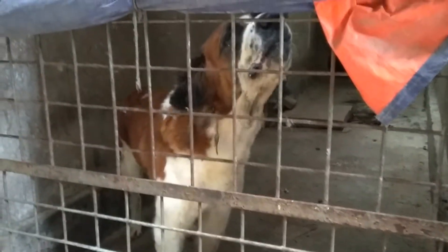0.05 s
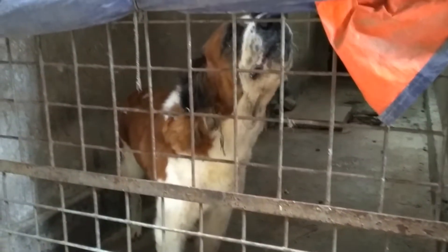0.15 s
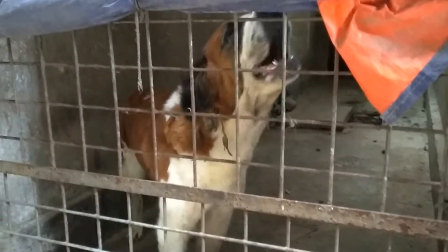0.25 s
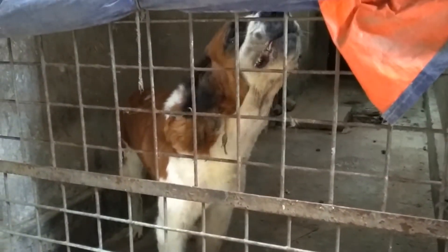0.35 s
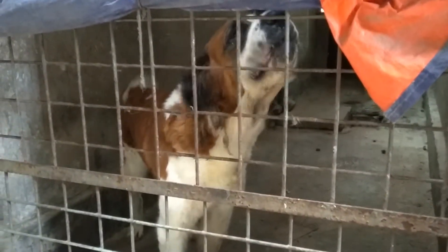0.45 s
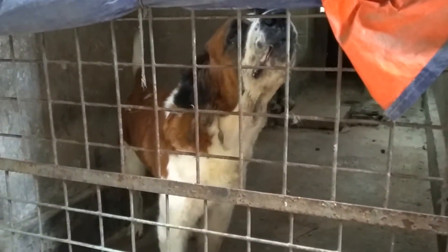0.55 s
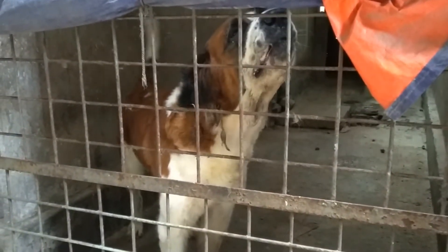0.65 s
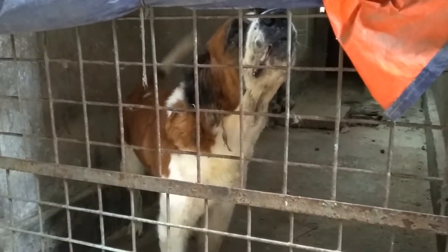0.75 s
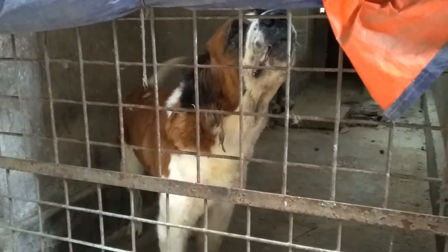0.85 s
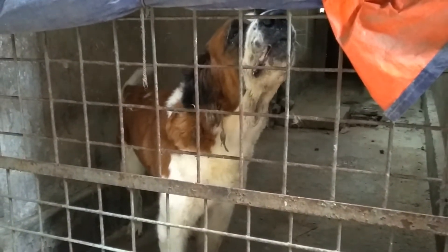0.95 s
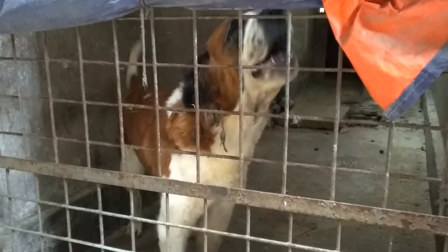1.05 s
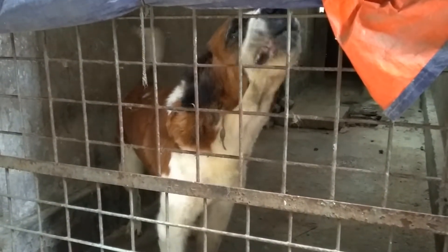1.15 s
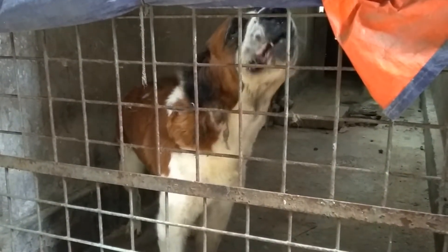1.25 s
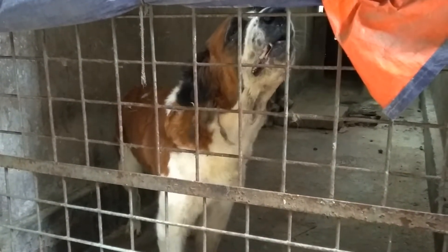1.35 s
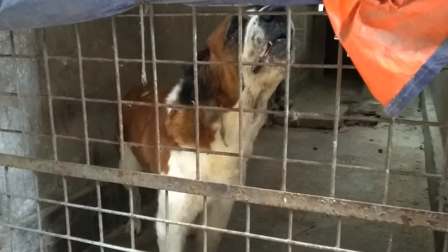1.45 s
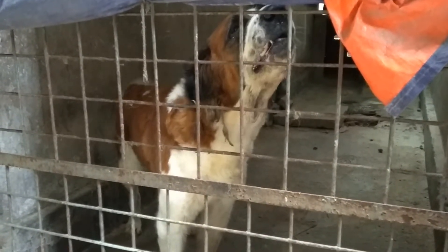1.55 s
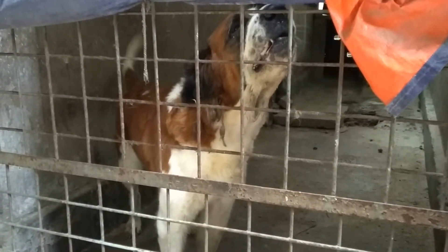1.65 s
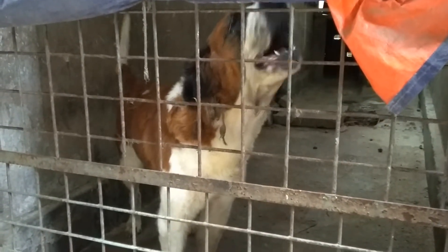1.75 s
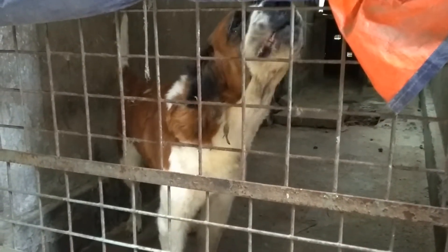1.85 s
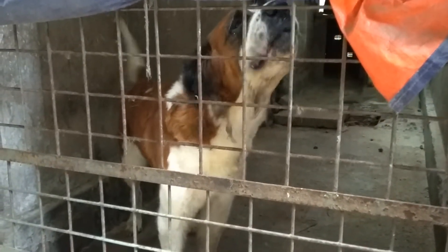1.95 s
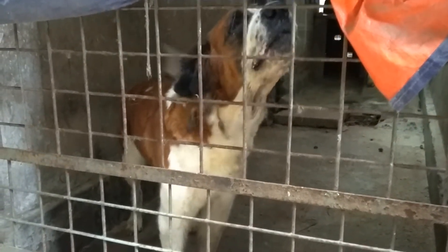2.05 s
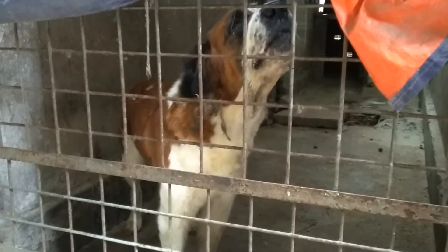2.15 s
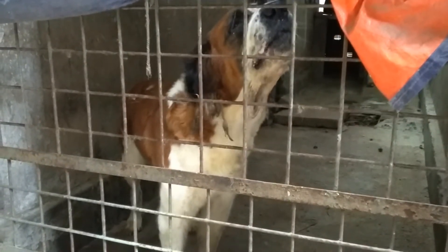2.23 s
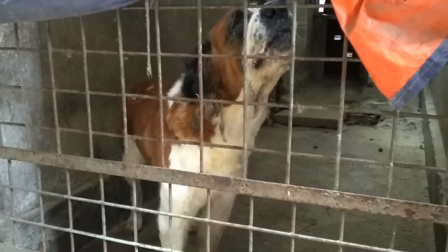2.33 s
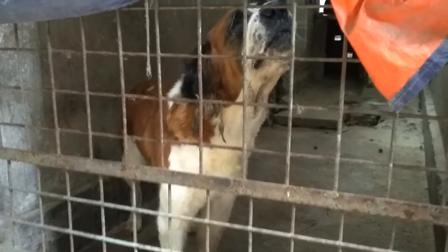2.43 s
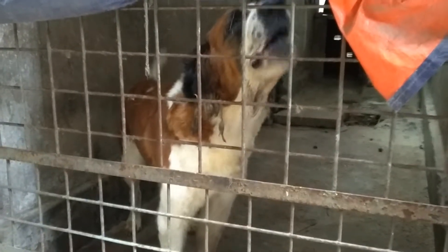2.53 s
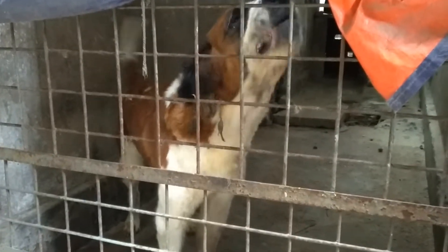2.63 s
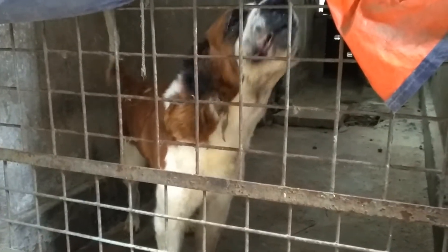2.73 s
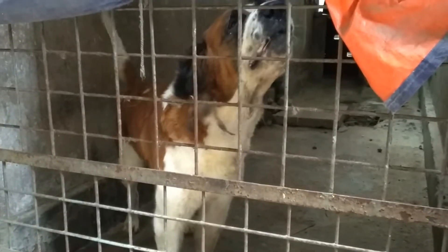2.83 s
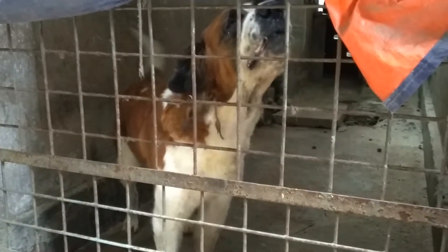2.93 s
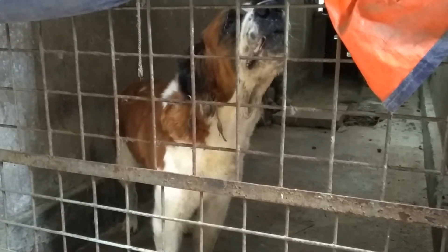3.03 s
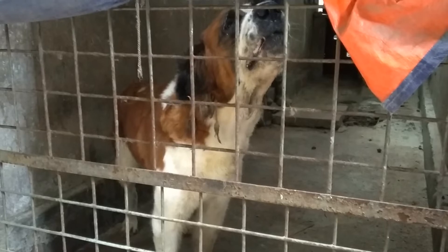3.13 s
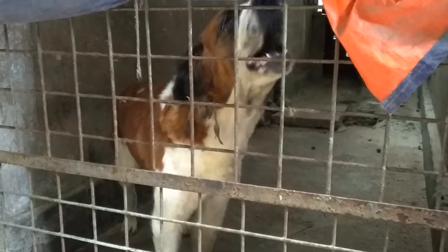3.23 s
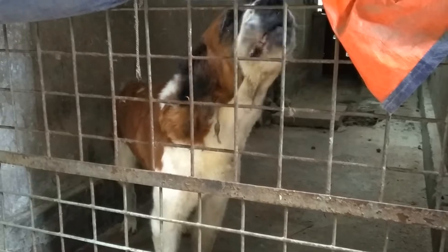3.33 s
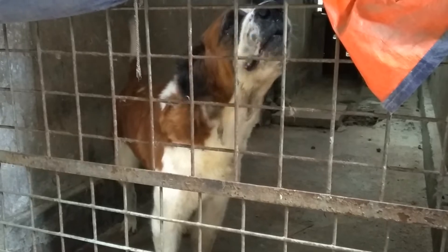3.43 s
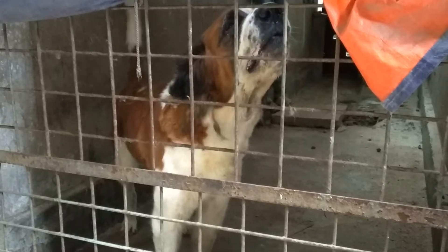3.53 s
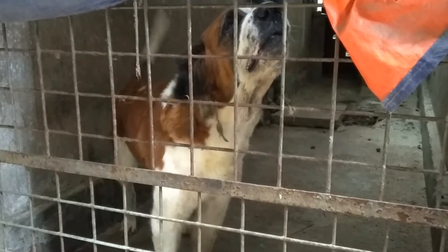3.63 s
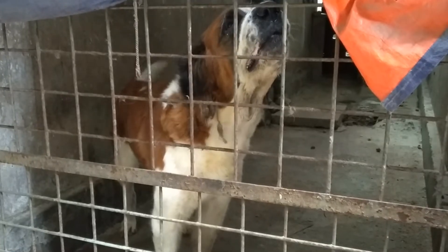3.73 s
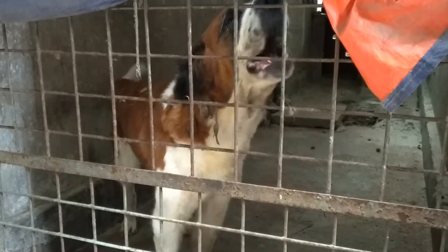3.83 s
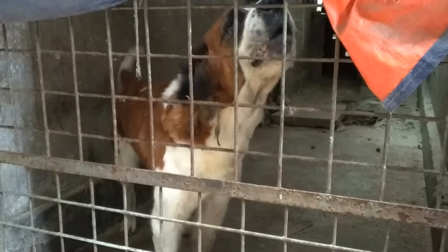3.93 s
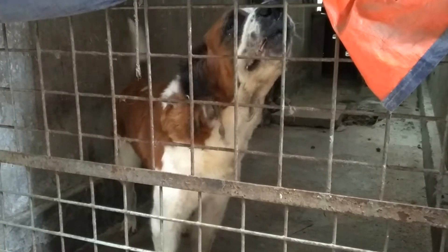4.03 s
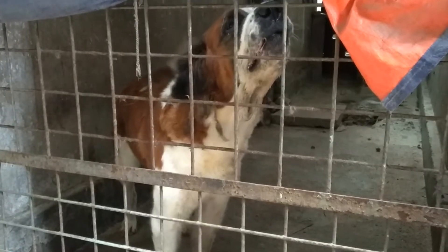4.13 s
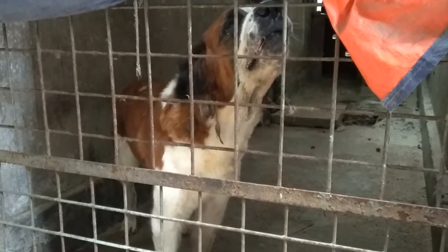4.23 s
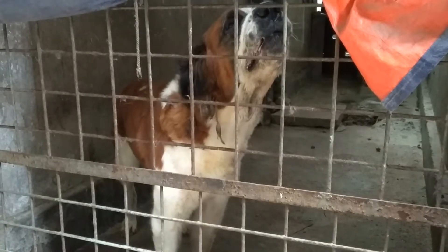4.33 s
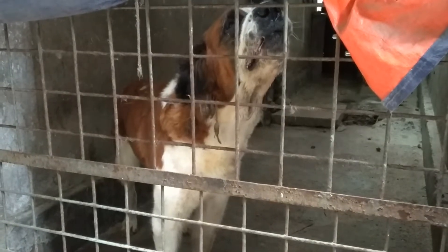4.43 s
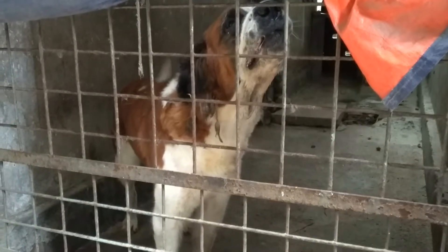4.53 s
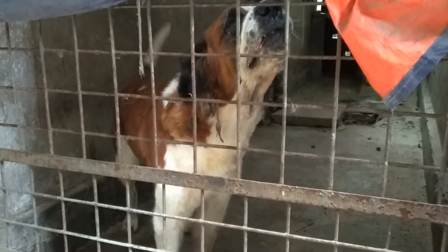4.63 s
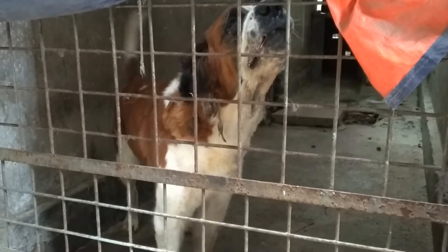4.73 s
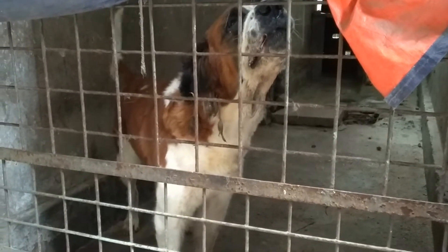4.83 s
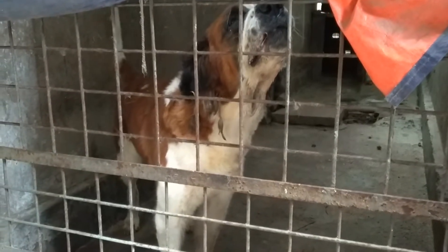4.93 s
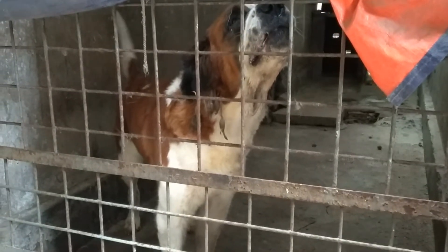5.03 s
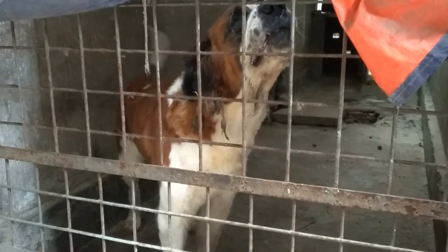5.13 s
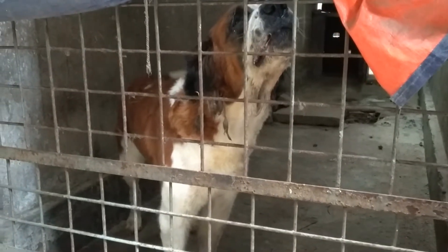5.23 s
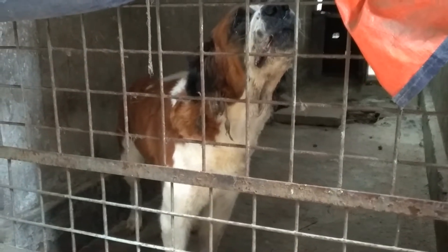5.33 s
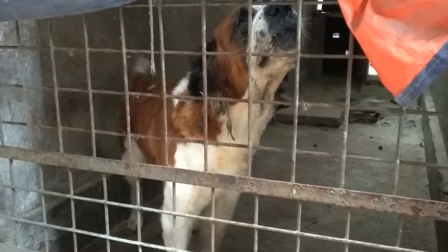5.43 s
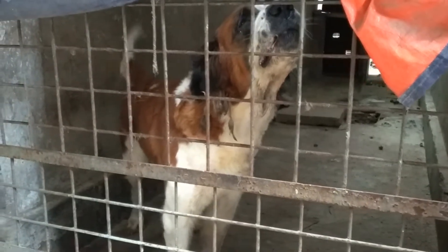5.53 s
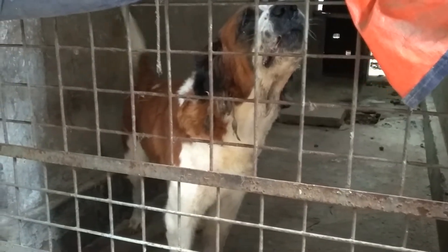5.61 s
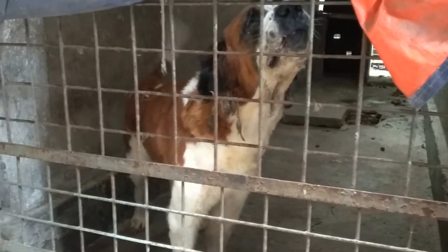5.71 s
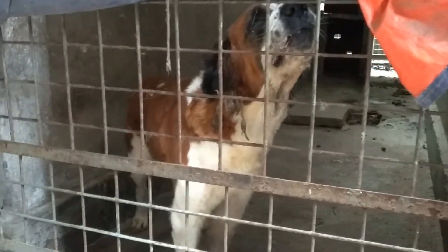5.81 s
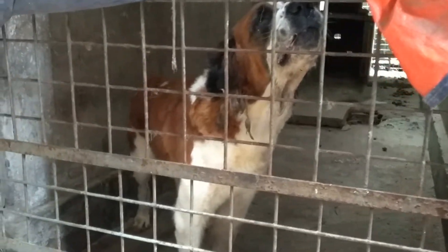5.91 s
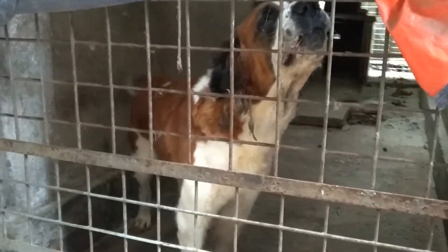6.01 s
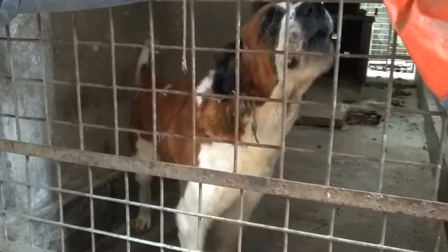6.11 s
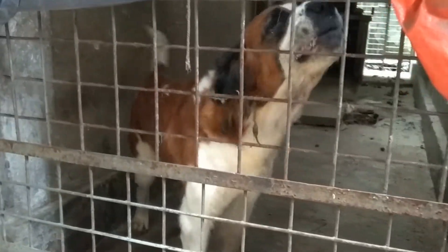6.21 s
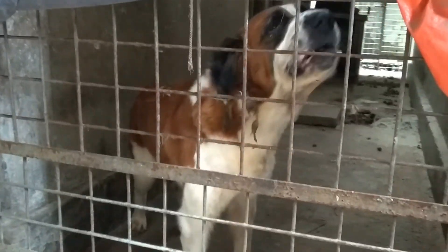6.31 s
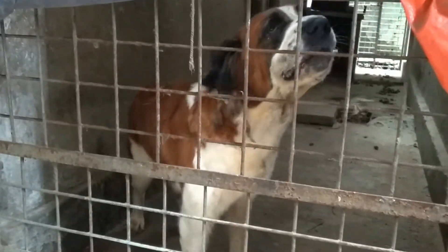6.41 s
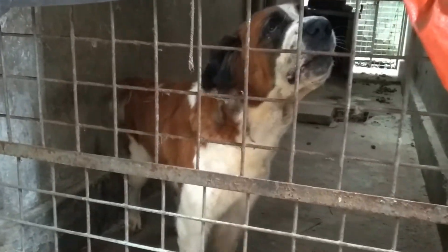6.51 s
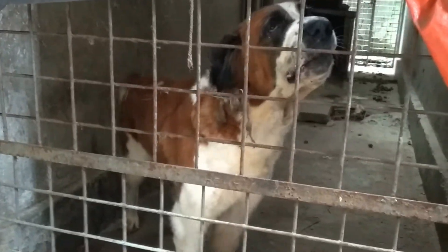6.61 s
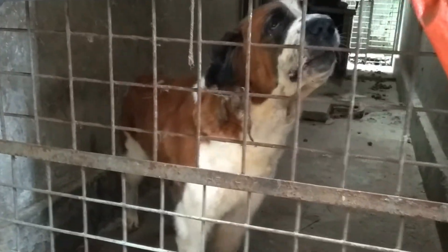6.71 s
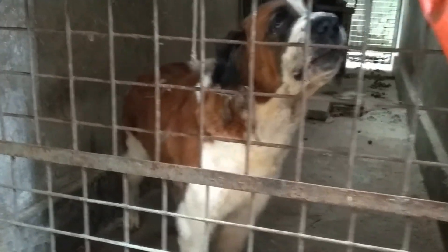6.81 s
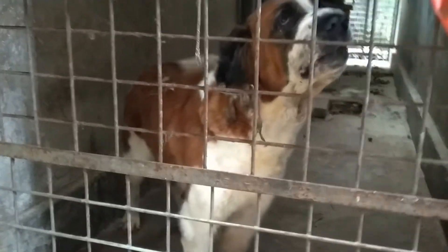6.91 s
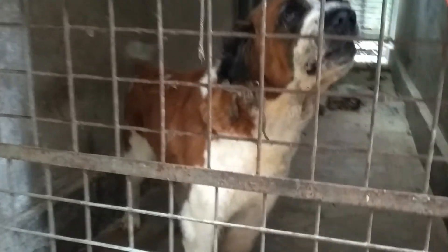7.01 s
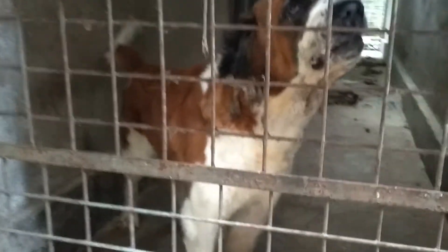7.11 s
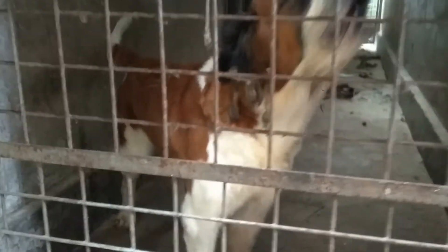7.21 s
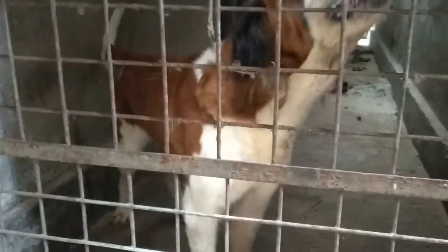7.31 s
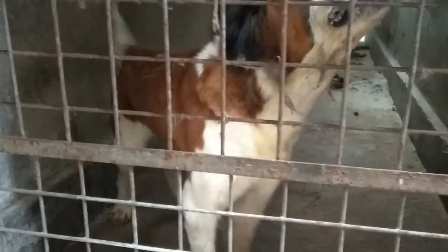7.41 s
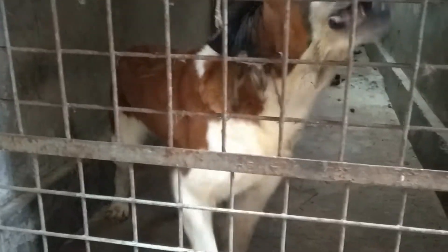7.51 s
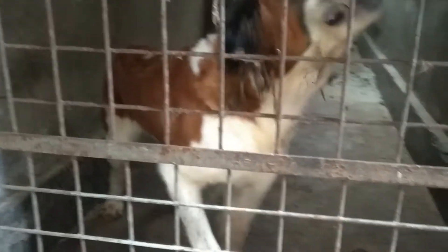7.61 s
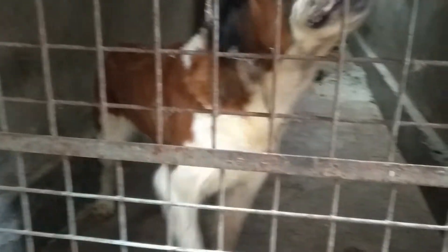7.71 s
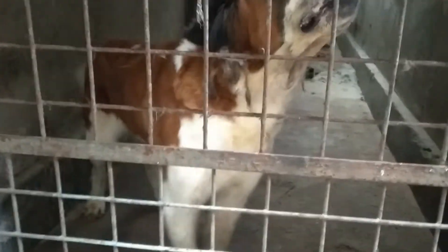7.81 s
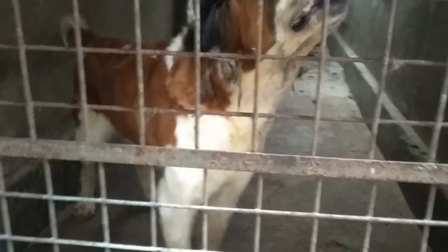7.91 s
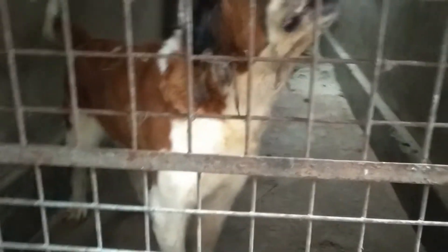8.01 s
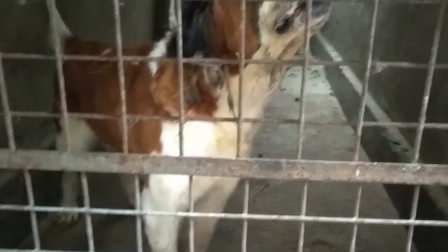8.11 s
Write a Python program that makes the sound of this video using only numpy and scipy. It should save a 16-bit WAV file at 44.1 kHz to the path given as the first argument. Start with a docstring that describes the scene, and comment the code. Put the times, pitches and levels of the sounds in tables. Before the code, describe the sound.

A low, unsteady rumble and the dying boom of an earlier bark open the scene. A large dog, close to a handheld camera, barks at about 0.2, 1.0, 1.7, 2.5, 3.2 and 3.8 seconds: loud, hoarse bursts whose pitch jumps up, sags and breaks into a short growl, with raspy air on top. Concrete walls ring after each, and the peaks sound squashed. A thin whine rises between 0.5 and 1.1. Small clicks of jaws or claws appear from 3.0. From 4 to 6 seconds there is only faint panting, echo, dull camera knocks and a very faint bird. A soft grunt at 5.85 and a falling whimper at 6.03 lead straight into a bark at 6.1. Low handling rustles follow, then barks at 7.1 and 7.5, the second softer. Echoes fade, with a bird chirp and low whine starting at 8.0.

```python
"""The boom of an earlier bark dies away over a low rumble, then a large dog barks nine times in a concrete kennel.
Each bark is uneven vocal-fold pulses and torn air: an arch of pitch that breaks into a short growl.
Filters shape throat and mouth, noise tails and resonators ring as the kennel, and the camera's limiter holds peaks down.
Between barks: a soft grunt, a falling whimper, panting and whines; clicks, light scuffs and a far bird; camera handling.
Noise bursts make the clicks, scuffs and handling rustles; gliding tones make the chirps and bumps."""
import sys
import numpy as np
from scipy import signal
from scipy.fft import rfft, irfft, next_fast_len
from scipy.io import wavfile
from scipy.ndimage import uniform_filter1d

SR = 44100
rng = np.random.default_rng(int(sys.argv[2]) if len(sys.argv) > 2 else 0)


def dump(signal):
    """Clip the signal to [-1, 1] and save it as 16-bit WAV at the path in sys.argv[1]."""
    limited = np.clip(np.atleast_2d(signal).T, -1, 1)
    pcm = np.round(limited * 32767).astype(np.int16)
    wavfile.write(sys.argv[1], SR, pcm)


N = 359856  # length in samples


def amp(db):
    """Decibels to gain."""
    return 10 ** (np.asarray(db) / 20)


def evened(x):
    """Scales to rms 1."""
    return x / np.sqrt(np.mean(x ** 2) + 1e-20)


def read(points, hz):
    """Reads a spectrum table on a log-frequency axis."""
    f, value = np.transpose(points)
    return np.interp(np.log(hz + 1), np.log(f + 1), value)


def add(mix, start_s, sound):
    """Mixes a sound in at its start time."""
    part = mix[max(round(start_s * SR), 0):][:len(sound)]
    part += sound[:len(part)]


def shaped(x, gain):
    """Filters by a gain given as a function of frequency."""
    size = next_fast_len(x.shape[-1] + SR // 10)
    spectrum = rfft(x, size) * gain(np.fft.rfftfreq(size, 1 / SR))
    return irfft(spectrum, size)[..., :x.shape[-1]]


def coloured(x, points, size=4096):
    """Causal filter: the resonances ring after the sound, never before."""
    hz = abs(np.fft.fftfreq(size, 1 / SR))
    log_gain = np.log(amp(read(points, hz)))
    # minimum phase, from the Hilbert transform of the log gain
    taps = np.fft.ifft(np.exp(np.conj(signal.hilbert(log_gain)))).real[:size // 2]
    return signal.oaconvolve(x, taps)[:len(x)]


def wander(count, hz):
    """Random drift of rms 1, fading out above about hz."""
    return evened(shaped(rng.standard_normal(count), lambda f: np.exp(-(f / hz) ** 2)))


def hiss(count, hz, octaves):
    """Noise in one bell-shaped band, rms 1."""
    bell = lambda f: np.exp(-.5 * (np.log2((f + 1) / hz) / octaves) ** 2)
    return evened(shaped(rng.standard_normal(count), bell))


def pair(a, b, likeness):
    """Turns two unrelated signals into left and right channels with a set likeness at each frequency."""
    same = lambda f: np.clip(read(likeness, f), -1, 1)
    right = shaped(a, same) + shaped(b, lambda f: np.sqrt(1 - same(f) ** 2))
    return np.array([a, right])


def kennel(x, delay=0.011, build_up=0.018):
    """Dense echoes off concrete: noise tails that build up (s), then die at each band's own speed."""
    # decay: hz, t60_s
    decay_times = [(150, 0.6), (400, 0.84), (1040, 0.66), (2760, 1), (7280, 0.49), (14000, .3)]
    # echo strength before each sound's wet level: hz, level_db
    echo_levels = [(100, -4.5), (300, -2), (600, -6.5), (1200, -10), (2500, -14.5), (5000, -9), (9000, -15)]
    # stereo width of the echoes: hz, left_right_likeness (0-1)
    echo_likeness = [(60, 0.9), (300, 0.96), (640, 0.87), (1400, 0.11), (3000, .05), (15000, .05)]
    hz, t, z = signal.stft(rng.standard_normal((2, SR)), SR, nperseg=512)
    z = z * amp(-60 * t / read(decay_times, hz)[:, None])
    z *= 1 - np.exp(-np.maximum(t - delay, 0) / build_up)
    # even out each band's energy before setting its level
    energy = uniform_filter1d((abs(z) ** 2).sum(2), size=3, axis=1)
    z *= amp(read(echo_levels, hz))[:, None] / np.sqrt(energy)[..., None]
    tails = signal.istft(z, SR, nperseg=512)[1] * np.sqrt(3) / 512
    return signal.fftconvolve(x[None], pair(*tails, echo_likeness), axes=1)[:, :N]


def rumble(swell_db=3.5, patchy_db=2):
    """Low outdoor background noise: the bass swells unevenly and three octaves above it waver on their own."""
    # colour of the background: hz, relative level_db
    colour = [(12, -24.5), (25, 3), (55, -4.5), (110, -12), (200, -14), (350, -14.5), (600, -19.5),
              (1050, -24.5), (1400, -38), (2000, -42.5), (3000, -49), (6000, -57.5), (11000, -58),
              (15500, -61.5)]
    # stereo width: hz, left_right_likeness (0-1)
    likeness = [(30, 0.058), (100, 0.73), (300, 0.97), (1200, 0.28), (3000, 0.22), (15000, 0.098)]
    # bass against the rest, before its swells: time_s, level_db
    deep_levels = [(0, -6), (1.4, -.5), (2.799, -1.5), (4.6, 0.5), (8.16, 2.5)]
    # background fader: time_s, level_db
    fader = [(0, -32), (.8, -35.5), (2.3, -37), (3.6, -35), (4.6, -37.5), (5, -36.5), (5.599, -38),
             (6.898, -37.5), (8.16, -37.5)]
    t = np.arange(N) / SR
    noise = pair(*rng.standard_normal((2, N)), likeness)
    noise = evened(shaped(noise, lambda f: amp(read(colour, f))))
    bass = shaped(noise, lambda f: np.exp(-(f / 220) ** 2))
    deep_db = np.interp(t, *np.transpose(deep_levels))
    out = noise + bass * (amp(deep_db + swell_db * wander(N, 8)) - 1)
    for hz in (400, 800, 1600):
        band = shaped(noise, lambda f: np.exp(-(2 * np.log2((f + 1) / hz)) ** 2))
        out = out + band * (amp(patchy_db * wander(N, 6.7)) - 1)
    return amp(np.interp(t, *np.transpose(fader))) * out


def last_echo(level_db=-31, t60=1.0):
    """The boom of an earlier bark: a band of noise already dying away at the start."""
    return amp(level_db - 60 * np.arange(N) / SR / t60) * hiss(N, 470, 0.31)


def bird(start_hz=4650, end_hz=3550, wet_db=2, direct_db=-8, buzz=.075):
    """A far bird: falling tones with a buzzy pitch, blurred by echoes that build up slowly."""
    # chirps: start_s, level_db
    chirps = [(2.009, -60), (4.598, -59), (5.29, -61), (7.01, -53.5), (8.018, -49)]
    out, count = np.zeros(N), int(.09 * SR)
    for start_s, level_db in chirps:
        hz = np.linspace(start_hz, end_hz, count) * (1 + buzz * wander(count, 400))
        tone = np.sin(2 * np.pi * np.cumsum(hz) / SR)
        add(out, start_s, amp(level_db) * tone * signal.windows.tukey(count, .2))
    return amp(direct_db) * out + amp(wet_db) * kennel(out, build_up=.06)


def bumps(edge_db=-9, edge_hz=650, dull_hz=1900):
    """Knocks on the camera body: a dull tick, and a short swing that slows down."""
    # knocks that drop in pitch: start_s, level_db, start_hz, end_hz, decay_s
    knocks = [(0.107, -30, 202, 50, .012), (1.971, -9.5, 113, 44.8, 0.025), (3.58, -25.5, 224, 73.5, 0.013),
              (4.089, -18, 262, 81.5, 0.0089), (4.332, -23.5, 228, 68.6, 0.019),
              (4.91, -15, 336, 64, 0.018), (5.249, -24, 240, 92, .012), (5.621, -13.5, 354, 74.6, .009),
              (5.953, -26, 200, 60.4, 0.012), (6.055, -14, 262, 60, 0.008), (8.001, -27, 213, 63.2, 0.02)]
    out, t = np.zeros(N), np.arange(SR // 5) / SR
    for start_s, level_db, start_hz, end_hz, decay_s in knocks:
        hz = end_hz + (start_hz - end_hz) * np.exp(-t / 0.004)
        swing = np.sin(2 * np.pi * np.cumsum(hz) / SR) * np.exp(-t / decay_s)
        tick = np.sin(2 * np.pi * edge_hz * t) * np.exp(-t / 0.0014)
        tick *= start_hz / 300  # knocks that start higher tick more
        add(out, start_s, amp(level_db) * (swing + amp(edge_db) * tick))
    return signal.lfilter(*signal.butter(2, dull_hz, fs=SR), out)


def small_sounds(wet_db=-5, left_db=3):
    """Clicks of jaws and claws as decaying noise; rustles, scuffs and a squeak as noise that swells and fades."""
    # jaws and claws: start_s, level_db, centre_hz, width_octaves, decay_s
    clicks = [(3.002, -42.5, 4500, 2.2, 0.0046), (3.428, -42, 3120, 0.17, 0.0027),
              (3.565, -62, 3500, 0.15, 0.0051), (4.047, -39.5, 3160, 0.18, 0.0039),
              (4.05, -48, 8500, 0.68, 0.003), (4.467, -51, 8900, 1.6, .006), (4.659, -65, 8870, 0.36, .008),
              (4.85, -60, 8500, 0.22, .008), (7.731, -54.5, 4400, 0.7, 0.017),
              (7.843, -65, 9100, 1.3, 0.0051), (8.013, -48, 2960, 0.66, 0.0052)]
    # low handling rustles of the camera, light scuffs, and first a thin, high squeak in the whimper
    # before the seventh bark: start_s, length_s, level_db, centre_hz, width_octaves
    noise_swells = [(6.019, 0.078, -54, 2350, .11), (6.216, 0.21, -55.5, 2990, 1),
                    (6.718, 0.13, -33, 150, 0.65), (6.95, 0.11, -32, 137, 0.8),
                    (7.28, 0.15, -29, 100, 0.78), (7.273, .15, -58, 2570, .3), (7.602, 0.31, -36, 90, 0.96)]
    out, t = np.zeros(N), np.arange(SR // 10) / SR
    for start_s, level_db, hz, octaves, decay_s in clicks:
        envelope = np.exp(-t / decay_s) * (1 - np.exp(-t / 0.00046))
        add(out, start_s, amp(level_db) * hiss(len(t), hz, octaves) * envelope)
    for start_s, length_s, level_db, hz, octaves in noise_swells:
        count = int(length_s * SR)
        add(out, start_s, amp(level_db) * hiss(SR, hz, octaves)[:count] * np.hanning(count))
    return out * amp([[left_db], [0]]) + amp(wet_db) * kennel(out)


def whine(rows, overtone_db=-26):
    """A thin, nearly pure tone that wavers a little, with one faint overtone; gives its start (s) and sound."""
    time_s, *columns = np.transpose(rows)
    t = np.arange(time_s[0], time_s[-1], 1 / SR)
    hz, level_db = (np.interp(t, time_s, column) for column in columns)
    phase = 2 * np.pi * np.cumsum(hz * (1 + 0.012 * wander(len(t), 110))) / SR
    tone = np.sin(phase) + amp(overtone_db) * np.sin(2 * phase)
    return time_s[0], amp(level_db) * tone * signal.windows.tukey(len(t), .1)


def pant(length_s, level_db, flutter_db=1.5):
    """The dog's breath: noise that swells and fades through its half-open mouth."""
    # half-open mouth: hz, level_db
    mouth = [(500, -23), (1000, -5), (1400, -3), (1600, -4), (1950, 2.5), (2200, -2), (2550, -20.5),
             (3200, -21), (4000, -21), (5500, -28.5), (6400, -22), (8000, -28), (15000, -42.5)]
    count = int(length_s * SR)
    air = evened(coloured(rng.standard_normal(count), mouth))
    return air * amp(level_db + flutter_db * wander(count, 40)) * signal.windows.tukey(count, .7)


def folds(effort_db, hz, rough, jitter=.075, shimmer=0.97, half_lines=1.0, slope=1.0,
          chest_hz=225, chest_pitch_hz=310, puff_db=13):
    """Vocal folds beat unevenly, strong and weak by turns, and let through a puff of air each cycle."""
    count, rough = len(hz), np.clip(rough, 0, 1)
    turns = np.cumsum(hz * (1 + jitter * rough * wander(count, 160))) / SR
    beat = evened(sum(np.cos(2 * np.pi * k * turns) / k ** slope for k in range(1, 13)))
    # half-rate pulsing makes cycles alternate; shimmer varies their strength at random
    beat *= 1 + rough * (half_lines * np.cos(np.pi * turns) + shimmer * wander(count, 160))
    puffs = evened((0.3 + np.exp(-(turns % 1) / 0.16)) * rng.standard_normal(count))
    puffs = shaped(puffs, lambda f: 1 / np.sqrt(1 + (f / 1500) ** 2)) * amp(puff_db)
    drive = (1 - rough ** 2) * beat + rough * puffs
    # the chest sounds mainly while the folds are slack and the pitch is low
    chest = shaped(drive, lambda f: 1 / (1 + (f / chest_hz) ** 8))
    drive = drive - chest * (1 - 1 / (1 + (hz / chest_pitch_hz) ** 6))
    return amp(effort_db) * drive * signal.windows.tukey(count, .05)


def grunt_or_whimper(length_s, effort_db, start_hz, end_hz, roughness):
    """A short, soft sound of the folds that sinks in pitch: a grunt when low, a whimper when higher."""
    count = int(length_s * SR)
    voiced = folds(effort_db, np.linspace(start_hz, end_hz, count), roughness)
    return voiced * signal.windows.tukey(count, 0.37)  # share spent swelling and fading


def rasp(t, effort_db, level_db, steepness=1.3, flutter_db=4.5, burst_db=3, burst_s=.018,
         burst_width_s=.02, held_db=-1.5):
    """Air tears past tongue and teeth in uneven spurts, following effort and hardest as the jaws fly open."""
    # upper resonances of the mouth: hz, level_db
    teeth = [(900, -23.5), (1500, 8), (1950, 12.5), (2200, -13), (2500, -0.5), (3150, -9.5), (3650, -5),
             (4100, -5.5), (4600, -8.5), (5900, -10), (6800, -12.5), (12500, -24), (15000, -28.5)]
    air = evened(coloured(rng.standard_normal(len(t)), teeth))
    opening_db = held_db + burst_db * np.exp(-((t - burst_s) / burst_width_s) ** 2)
    return air * amp(level_db + opening_db + steepness * effort_db + flutter_db * wander(len(t), 150))


def bark(rise, hold, growl, force_db, top_hz, roughness, growl_db, rasp_db):
    """One push of the chest swells, holds while the pitch arches, then breaks into a growl; gives voice and air."""
    start_db, sag_db, break_db, growl_fade_db = -32.5, -0.5, -3.5, -9.5
    break_share, growl_share = .25, .55  # break and growl crest, as shares of the growl's length
    slack_hz, attack_hz, climb_s, sag_hz_per_s = 128.62, 355, .042, 350
    rough_attack, rough_growl = .42, .72  # roughness 0-1
    t = np.arange(-rise, hold + growl, 1 / SR)  # full force falls at zero
    breaks, crest, end = hold + growl * np.array([break_share, growl_share, 1])
    effort_db = force_db + np.interp(
        t, [-rise, 0, hold, breaks, crest, end],
        [start_db, 0, sag_db, growl_db + break_db, growl_db, growl_db + growl_fade_db])
    # slack folds at both ends; a climb to the top, a slow sag, then the fall
    sagged_hz = top_hz - sag_hz_per_s * (breaks - climb_s)
    hz = np.interp(t, [-rise, 0, climb_s, breaks, end],
                   [slack_hz, attack_hz, top_hz, sagged_hz, slack_hz])
    rough = np.interp(t, [0, climb_s, hold, breaks],
                      [rough_attack, roughness, roughness, rough_growl])
    return folds(effort_db, hz, rough), rasp(t, effort_db, rasp_db)


def walls(x):
    """Standing waves between parallel walls: narrow resonators that ring on after each sound."""
    # ringing before its mix level: pitch_hz, width_hz, level_db
    modes = [(284, 15, -4), (418, 25, -2), (513, 31, -3.5), (605, 67, -4), (675, 14, -4.5),
             (810, 14, -15.5), (946, 14, -9), (1023, 8.3, -1.5), (1179, 86, -6.5), (1434, 71, -4.5),
             (1560, 41, -3.5), (1937, 84, 1)]
    return sum(amp(level_db) * signal.lfilter(*signal.iirpeak(hz, hz / width_hz, SR), x)
               for hz, width_hz, level_db in modes)


def near_walls(x, level_db=-3, first_s=.001, last_s=0.017, count=6):
    """A few early echoes off floor, bars and side walls, different at each port."""
    taps = np.zeros((2, SR // 10))
    for ear in taps:
        places = (rng.uniform(first_s, last_s, count) * SR).astype(int)
        ear[places] = rng.choice([-1, 1], count) / np.sqrt(count)
    return amp(level_db) * signal.oaconvolve(x[None], taps, axes=1)[:, :N]


def dog(direct_db=-3, rasp_direct_db=-2, rasp_wet_db=-1, voice_wet_db=-1, ring_direct_db=-2, ring_wet_db=-10):
    """Barks, grunt, whimper, panting and whines in the kennel, as they reach the two microphone ports."""
    # barks: full_force_s, rise_s, hold_s, growl_s, effort_db, top_hz, roughness (0-1),
    # growl_db (against the effort), rasp_db (level of the airy rasp)
    bark_events = [(0.201, 0.045, .085, .110, -0.5, 522.4, 0.56, -8, -38.5),
                   (1.008, 0.042, .105, .090, -1.5, 422, 0.58, -8.5, -40),
                   (1.705, .055, .085, .130, 0.5, 431.4, .62, -11, -41.5),
                   (2.502, 0.047, .088, 0.14, -1.5, 540.3, 0.42, -13.5, -36.5),
                   (3.164, 0.05, .090, 0.093, -2, 561, 0.54, -8.5, -36),
                   (3.758, 0.056, 0.11, .085, -1.5, 556.6, 0.56, -13, -36),
                   (6.104, .025, .070, 0.15, 1, 569.8, 0.7, -12, -39.5),
                   (7.140, 0.026, .075, .145, -0.5, 510, 0.54, -7, -45),
                   (7.460, .045, .105, 0.14, -3, 443.2, 0.54, -14, -43)]
    # a soft grunt and a short falling whimper: start_s, length_s, effort_db, start_hz, end_hz, roughness (0-1)
    soft_voice_events = [(5.849, .085, -30, 226, 216, 0.38), (6.033, 0.07, -22.5, 414, 318, .15)]
    # panting: start_s, length_s, level_db
    pant_events = [(3.559, .22, -54), (4.271, .4, -54.5), (5.057, .44, -55)]
    # whines through the nose, one table each: time_s, pitch_hz, level_db
    whine_tables = [
        [(.48, 1160, -77), (.58, 1210, -41.5), (.66, 1295, -43), (.76, 1367, -43.5), (.86, 1375, -43),
         (.98, 1370, -46), (1.08, 1300, -62)],
        [(8.0, 915, -63), (8.04, 918, -46), (8.2, 858, -40)],
    ]
    # throat and open mouth: hz, level_db
    throat = [(60, -27.5), (150, -1), (300, -4), (560, -1), (690, -2), (790, -13.5), (950, -10.5),
              (1200, -7.5), (1370, -23), (1720, -35.5), (1950, -32.5), (2200, -45), (5000, -53.5),
              (14000, -70)]
    # stereo tilt: hz, left_minus_right_db
    balance = [(200, -0.5), (700, 0), (1200, -5), (1700, 4), (2400, 8.5), (4400, 7.5), (8100, 2.5),
               (15000, 0.5)]
    # kennel sound: hz, left_lead_radians
    phase_lead = [(100, -0.22), (500, 0.0084), (860, 0.45), (1290, 1.2), (1720, .5), (2000, 1.5), (2670, 1)]
    voice, air = np.zeros((2, N))
    for force_s, rise_s, *shape in bark_events:
        voiced, airy = bark(rise_s, *shape)
        add(voice, force_s - rise_s, voiced)
        add(air, force_s - rise_s, airy)
    for start_s, *shape in soft_voice_events:
        add(voice, start_s, grunt_or_whimper(*shape))
    for start_s, *shape in pant_events:
        add(air, start_s, pant(*shape))
    voice = coloured(voice, throat)
    for rows in whine_tables:
        add(voice, *whine(rows))  # whines bypass the throat filter
    ring = walls(voice + air)
    direct = amp(direct_db) * voice + amp(rasp_direct_db) * air
    send = amp(voice_wet_db) * voice + amp(rasp_wet_db) * air + amp(ring_wet_db) * ring
    room = near_walls(air) + amp(ring_direct_db) * ring + kennel(send)
    side = np.array([[.5], [-.5]])  # half of each difference goes to either port
    lead_s = 0.0002  # the direct sound reaches the left port this much earlier
    heard = shaped(direct, lambda f: np.exp(2j * np.pi * side * f * lead_s))
    heard = heard + shaped(room, lambda f: np.exp(1j * side * read(phase_lead, f)))
    return shaped(heard, lambda f: amp(side * read(balance, f)))


def scene():
    """Everything that reaches the camera, with the bumps stronger on the left."""
    background = rumble() + last_echo() + bird()
    handling = bumps() * amp([[1.5], [-1.5]])
    return background + handling + small_sounds() + dog()


def record(dry, threshold_db=-2.5, ceiling_db=-1.8, recovery_db_per_s=70, knee=24):
    """A fast limiter turns loud peaks down, crests that slip past are rounded off, then the top is cut."""
    attack_s, edge_hz = .0004, 15750
    peak_db = 20 * np.log10(abs(dry).max(0) + 1e-9)
    # hold each peak, letting it fall at the recovery speed
    fall = np.arange(N) * recovery_db_per_s / SR
    held_db = np.maximum.accumulate(peak_db + fall) - fall
    over_db = np.maximum(held_db - threshold_db, 0)
    keep = np.exp(-1 / (attack_s * SR))
    limited = dry / amp(signal.lfilter([1 - keep], [1, -keep], over_db))
    clipped = limited / (1 + abs(limited / amp(ceiling_db)) ** knee) ** (1 / knee)
    low_pass = signal.firwin(511, edge_hz, window=("kaiser", 9), fs=SR)
    return signal.oaconvolve(clipped, low_pass[None], "same")


dry = scene()
out = record(dry)
dump(out)
```